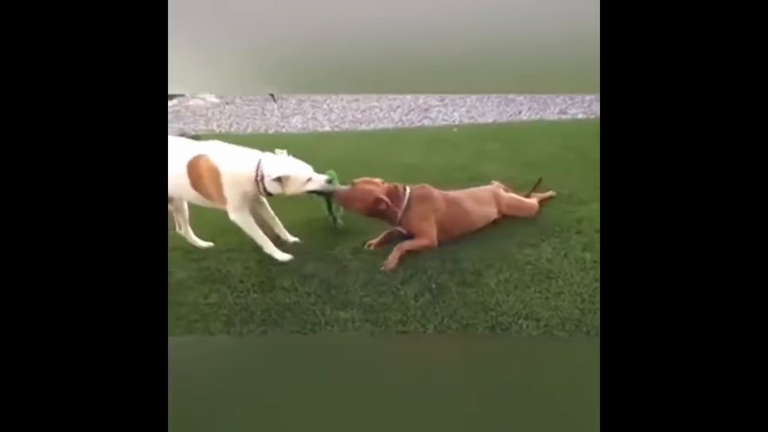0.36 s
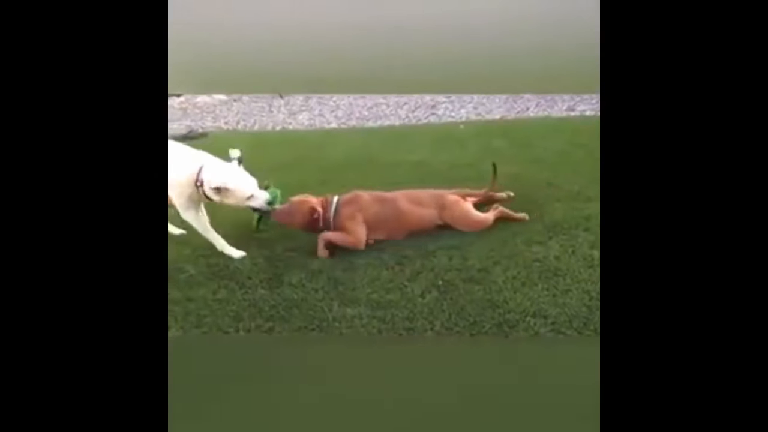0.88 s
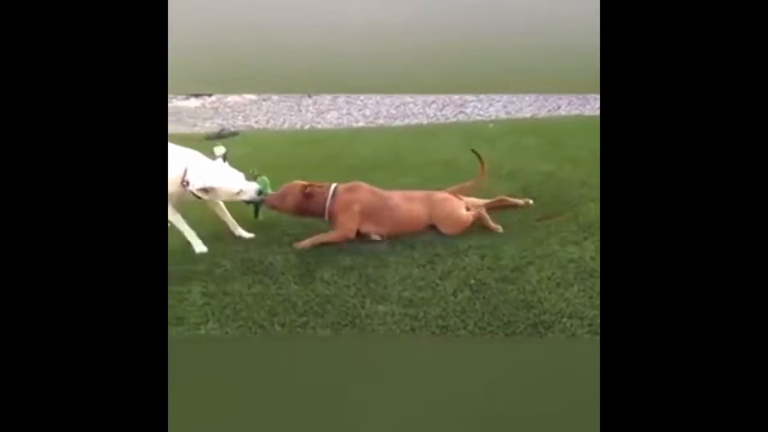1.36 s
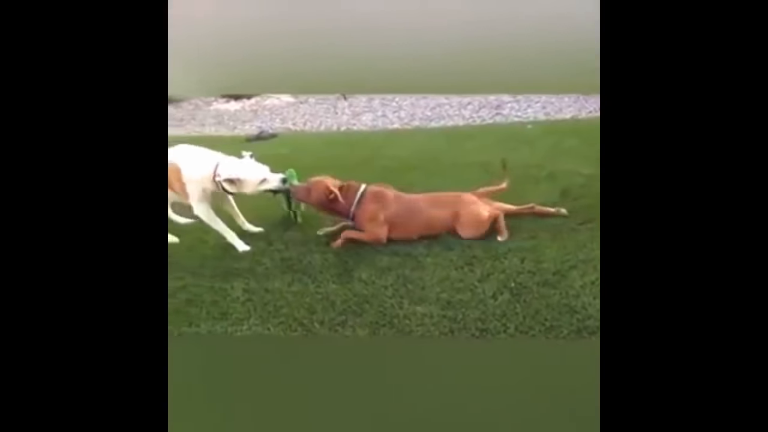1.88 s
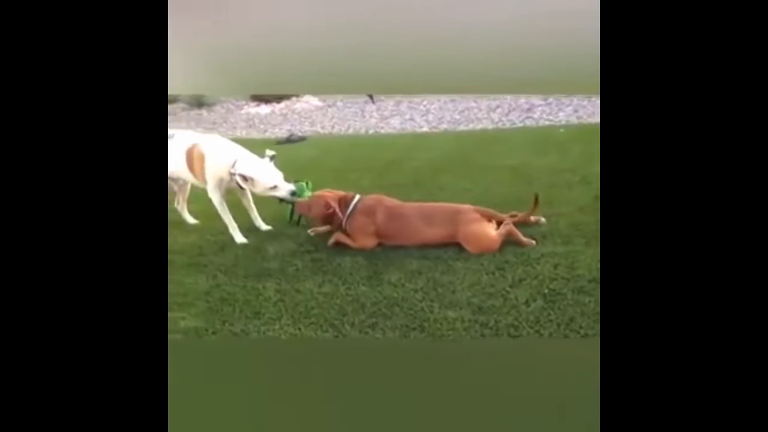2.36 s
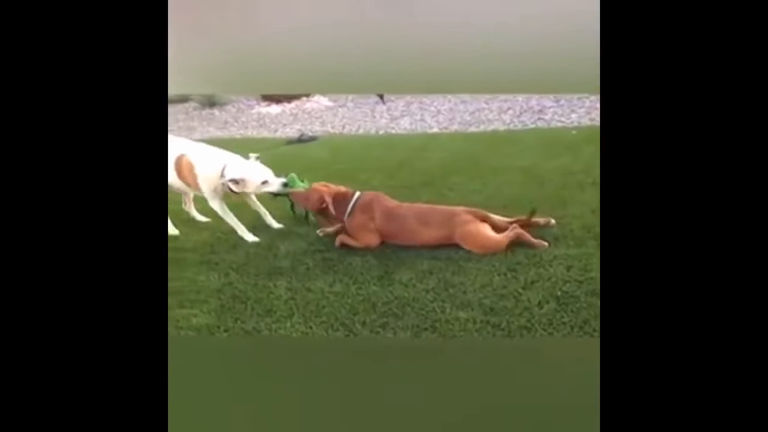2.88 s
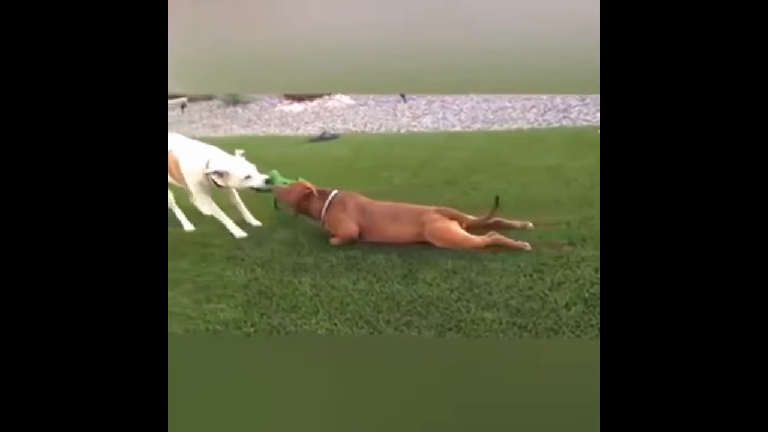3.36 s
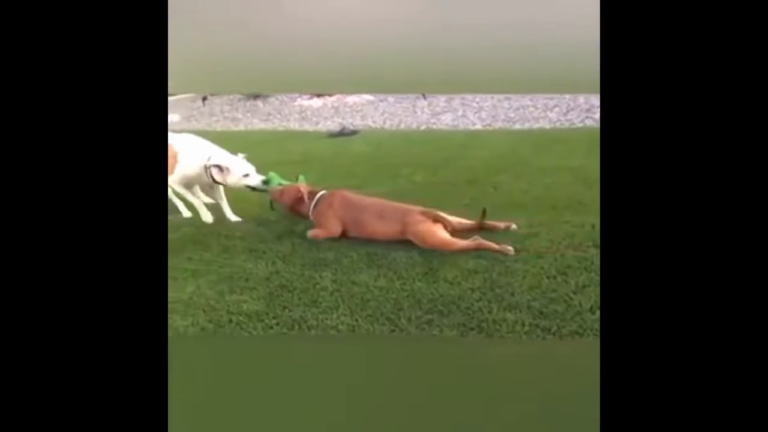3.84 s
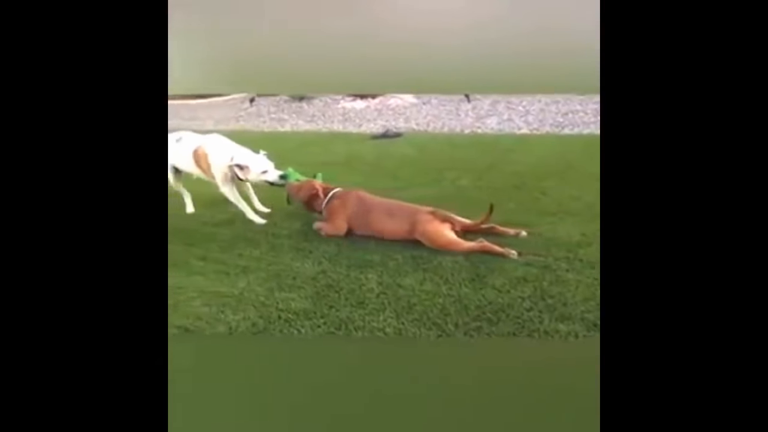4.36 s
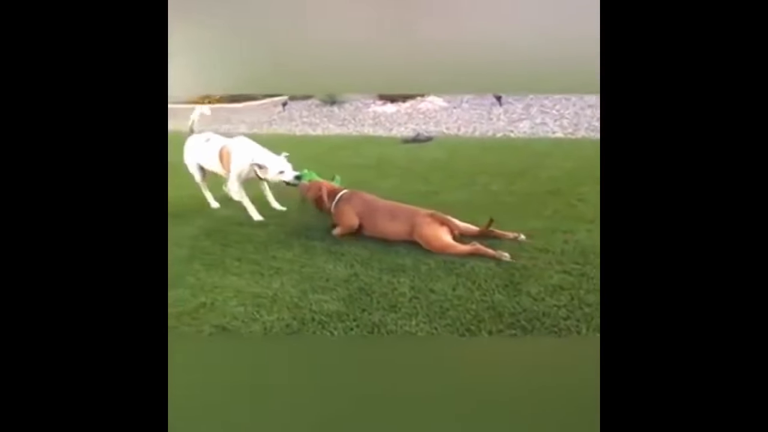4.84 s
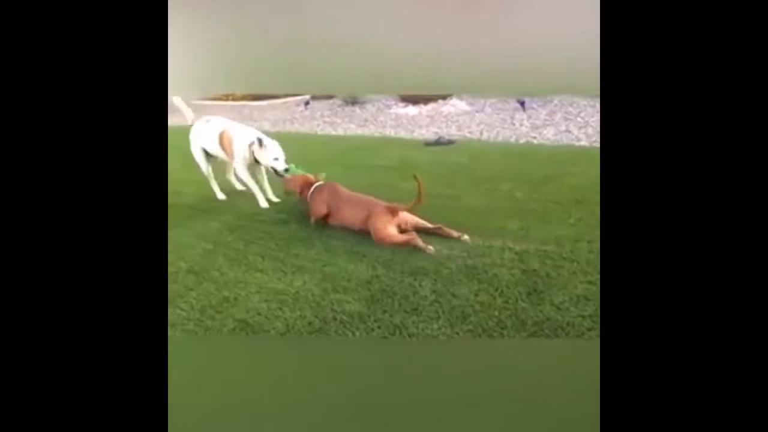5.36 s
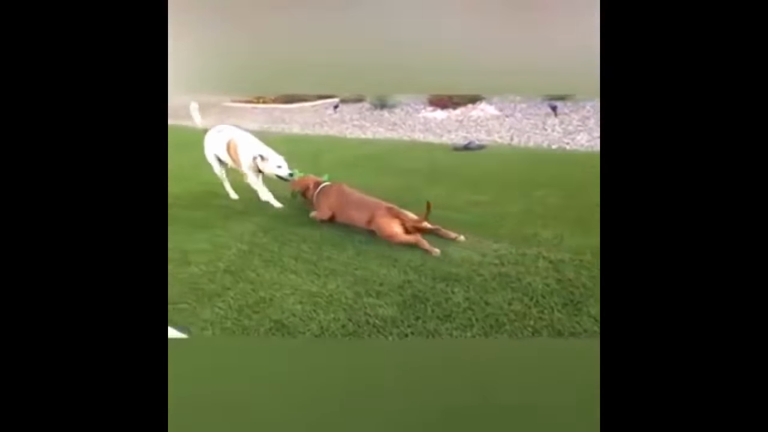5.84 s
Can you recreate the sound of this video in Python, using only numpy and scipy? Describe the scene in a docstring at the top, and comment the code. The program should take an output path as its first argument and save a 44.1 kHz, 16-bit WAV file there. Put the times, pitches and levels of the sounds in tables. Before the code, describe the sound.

For six seconds two dogs growl playfully over a toy gripped in their teeth. The growls start at once, low and throaty, in short uneven bursts of a tenth to nearly half a second, fluttering and gravelly, their pitch sagging and jumping. Strong ones come near 0.9, 1.4 and 2.1 seconds; a longer one runs from about 2.8 to 3.1. Rasping, slightly wet breath rides on them, with hiss between the teeth. Hollow little snaps of jaw and toy scatter throughout, some brighter around 3.1 to 3.5 and clustered from 4.3 to 5. Thin, faint whines slip out around 3.2 to 3.4, 3.7 to 3.9 and 5.05 to 5.3. Light dry grass scuffs are barely noticed. The sound dips for an instant at 1.86. Behind lies a soft outdoor hush, nearly no echo; the small microphone is close, mono, lacking deep bass and the highest treble.

```python
"""Dogs tugging at a toy

Two dogs tug at a toy on a lawn, growling in short throbbing bursts: uneven fold pulses drive resonances.
Noise rasps and hisses through muzzle and teeth; jaws and toy snap as ringing puffs; thin sine whines slip out.
Grass scuffs and a shaped-noise outdoor hush lie around them; the level dips once for an instant."""
import sys
import numpy as np
from scipy import signal
from scipy.io import wavfile
from scipy.ndimage import uniform_filter1d

SR = 44100
rng = np.random.default_rng(int(sys.argv[2]) if len(sys.argv) > 2 else 0)


def generate_wav(sig):
    """Save sig (samples, or channels by samples) to the path in sys.argv[1] as 16-bit PCM at SR."""
    pcm = np.round(np.clip(np.atleast_2d(sig).T, -1, 1) * 32767).astype(np.int16)
    wavfile.write(sys.argv[1], SR, pcm)


def ratio(d):
    """dB to gain"""
    e = np.asarray(d, float) / 20
    return 10 ** e


N = 263277

# growls, one table each: (time [s], effort [dB], fold pitch [Hz])
GROWLS = [
    [(0.002, -27.5, 225), (0.022, -31, 220.8), (0.044, -27, 211.4), (0.058, -38, 211.7), (0.08, -55, 205.9),
     (0.11, -42, 203)],
    [(0.175, -40.5, 148), (0.187, -36.5, 146.5), (0.205, -49, 149.5), (0.215, -42.5, 147.2)],
    [(0.225, -39, 171), (0.257, -27.5, 187.4), (0.279, -28, 188.9), (0.311, -34, 185.2), (0.351, -29, 186),
     (0.375, -42, 204.6), (0.41, -74, 202.3)],
    [(0.507, -38.5, 193.9), (0.521, -32.5, 188.4), (0.547, -36.5, 205.9), (0.615, -36, 212),
     (0.651, -29.5, 190), (0.665, -34.5, 174.7), (0.713, -51.5, 159.5)],
    [(0.72, -47.5, 146.3), (0.756, -30.5, 151.3), (0.812, -46.5, 145.7), (0.834, -37.5, 150.2),
     (0.86, -45.5, 147.7), (0.865, -39.5, 145.2)],
    [(0.872, -35, 242), (0.894, -24.5, 242.2), (0.92, -26.5, 252.8), (0.928, -28.5, 243),
     (0.95, -37, 214.6), (0.976, -51, 192.2), (1.0, -60.5, 193)],
    [(1.072, -37.5, 179.1), (1.098, -32.5, 182.2), (1.132, -39.5, 149.1), (1.162, -36, 148),
     (1.19, -31.5, 159.1), (1.222, -40.5, 153.8), (1.26, -53, 160.5)],
    [(1.338, -37, 202.3), (1.374, -26, 201), (1.398, -29.5, 201.7), (1.426, -26.5, 213.9),
     (1.462, -37.5, 211.2), (1.49, -49, 196.7), (1.51, -58, 196.7)],
    [(1.525, -48, 147.8), (1.597, -39, 150.7), (1.613, -43.5, 149.6), (1.625, -43, 154.1)],
    [(1.632, -35, 197.4), (1.658, -30, 191.9), (1.756, -30, 199.7), (1.786, -33, 180.5),
     (1.886, -40, 182.3), (1.912, -35.5, 160), (1.935, -81, 159.4)],
    [(1.965, -50, 177.3), (1.983, -40.5, 179.8), (1.997, -46, 167.5), (2.015, -47, 161.2),
     (2.033, -42, 160.3), (2.06, -44.5, 155.9)],
    [(2.072, -39, 218.2), (2.098, -21.5, 211.7), (2.13, -29, 181), (2.196, -53, 181.3), (2.22, -43, 177.7),
     (2.242, -49.5, 170.4), (2.27, -57.5, 171.1)],
    [(2.306, -35.5, 197.9), (2.336, -33, 199.2), (2.41, -35.5, 160.4), (2.452, -36, 155.8),
     (2.496, -43, 202.6), (2.576, -40.5, 149.4), (2.62, -59.5, 150)],
    [(2.695, -39.5, 149), (2.709, -52, 148.4), (2.733, -50.5, 147.7), (2.76, -52, 148.2)],
    [(2.775, -46, 167.1), (2.811, -33, 190.6), (2.843, -29, 189.4), (2.889, -31.5, 161.6),
     (2.959, -32, 192.8), (3.063, -37, 151.1), (3.12, -66.5, 148.8)],
    [(3.222, -37, 176.2), (3.236, -31.5, 174.2), (3.25, -34.5, 173.7), (3.272, -49.5, 165.2),
     (3.28, -56, 158.8)],
    [(3.364, -37.5, 163.8), (3.38, -29, 163.4), (3.408, -36.5, 164.1), (3.484, -53, 163.9),
     (3.49, -55.5, 165)],
    [(3.518, -37.5, 191.6), (3.532, -27, 189), (3.568, -35, 192.8), (3.582, -44, 191.9),
     (3.602, -52, 199.3), (3.61, -59.5, 201.7)],
    [(3.71, -33, 180.6), (3.73, -30.5, 178.1), (3.76, -35.5, 196.1), (3.788, -28.5, 171.3),
     (3.818, -33, 168.6), (3.84, -39, 151.1), (3.87, -53, 147.3)],
    [(3.96, -35.5, 202), (3.986, -33, 203.1), (4.016, -31, 184.3), (4.044, -32, 186.7), (4.08, -37.5, 210),
     (4.134, -36, 174.8), (4.19, -53.5, 173.9)],
    [(4.3, -39.5, 172.8), (4.332, -32, 178.5), (4.364, -29.5, 186.3), (4.396, -39.5, 218),
     (4.428, -35, 208.5), (4.458, -38, 169.9), (4.53, -51, 195.8)],
    [(4.56, -36.5, 148.2), (4.576, -45.5, 148.2), (4.602, -37, 149.5), (4.624, -35.5, 149.2),
     (4.65, -43, 163.6), (4.7, -54.5, 163.8), (4.72, -68, 163.8)],
    [(4.81, -49.5, 217.2), (4.846, -32.5, 218.4), (4.894, -35.5, 215.8), (4.93, -41, 275.8),
     (4.962, -33, 269.3), (5.028, -39.5, 164.4), (5.08, -48.5, 154.1)],
    [(5.098, -43.5, 186), (5.12, -28.5, 182.8), (5.15, -52, 201), (5.17, -55, 194.2)],
    [(5.302, -37.5, 201.6), (5.338, -30, 202.7), (5.38, -31.5, 233.4), (5.42, -33, 248.2),
     (5.44, -35.5, 230.3), (5.492, -29, 231.1), (5.544, -42.5, 150), (5.575, -70, 149.7)],
    [(5.732, -32.5, 185.7), (5.758, -40.5, 183.6), (5.78, -30, 174.1), (5.808, -34.5, 196.8),
     (5.882, -41.5, 194.6), (5.934, -29, 205), (5.97, -54, 176)],
]
# moments when the folds lock every second beat: (middle [s], strength [dB], length [s])
FLUTTERS = [(.185, -43, 0.034), (0.257, -32, 0.054), (.55, -31.5, 0.051), (0.647, -44, 0.053),
            (0.754, -30, 0.05), (0.826, -45, 0.042), (.885, -35.5, 0.035), (0.963, -43.5, 0.038),
            (1.121, -29.5, 0.064), (1.194, -41.5, 0.049), (1.347, -40, 0.031), (1.459, -40, 0.038),
            (1.54, -44.5, 0.051), (1.6, -39.5, 0.032), (1.66, -44.5, 0.024), (1.89, -47, 0.028),
            (2.031, -40.5, 0.049), (2.111, -44.5, 0.063), (2.226, -42.5, 0.031), (2.33, -34.5, 0.065),
            (2.406, -36.5, 0.038), (2.53, -34, 0.056), (2.704, -38, 0.035), (2.83, -37, 0.064),
            (2.98, -41, 0.034), (3.07, -45, 0.045), (3.237, -39.5, 0.043), (3.384, -36.5, 0.052),
            (3.482, -46.5, 0.038), (3.62, -41.5, 0.031), (3.751, -33, .06), (3.814, -37.5, 0.038),
            (3.984, -32, 0.043), (4.119, -41.5, 0.069), (4.251, -42, 0.038), (4.331, -34.5, 0.053),
            (4.44, -36.5, 0.043), (4.616, -34.5, 0.045), (4.69, -41, 0.034), (4.83, -31.5, 0.056),
            (4.927, -36, 0.036), (5.0, -35.5, 0.056), (5.322, -30, 0.048), (5.781, -41, 0.06),
            (5.9, -43, 0.046)]
# how the grip on the toy shapes the mouth: (time [s], jaw ring [dB], brightest band between the teeth [Hz])
GRIP = [(0, -2.5, 3720), (.3, -2, 3360), (.39, -5, 3660), (0.599, -1.5, 4170), (.9, 1, 3340),
        (1.15, -8, 3430), (1.42, 0, 3270), (1.75, 0.5, 3960), (1.9, -1, 3230), (2.1, -1, 3410),
        (2.4, -1.5, 3600), (2.9, -3, 3600), (3.4, -2.5, 3530), (3.8, 1, 3800), (4.07, -1, 3670),
        (4.38, -0.5, 3450), (4.51, 3.5, 3900), (4.7, 8, 3470), (4.9, 2, 3700), (5.4, 2.5, 3670),
        (5.85, 3.5, 3640)]
# breaths forced past the toy:
# (start [s], length [s], rasp [dB], mouth resonance [Hz], tooth hiss [dB re rasp])
BREATHS = [(0, 0.092, -40, 1200, -6), (0.113, 0.059, -50.5, 1344, -24), (0.21, 0.21, -43.5, 1480, -9.5),
           (0.376, 0.021, -41.5, 1560, -7.5), (0.455, 0.046, -47.5, 1120, -26),
           (0.517, 0.037, -47.5, 970, -11), (0.524, 0.21, -46.5, 1050, 0), (0.735, 0.086, -48, 1705, -9.5),
           (0.889, 0.042, -36, 1187, -10), (0.939, 0.05, -51.5, 1646, -1.5),
           (1.151, 0.14, -55.5, 1560, -19.5), (1.205, 0.022, -46, 1520, -4),
           (1.376, 0.092, -39.5, 1152, -9.5), (1.461, 0.16, -49.5, 1200, -7.5),
           (1.649, 0.26, -42, 1200, -10.5), (1.866, 0.098, -51.5, 1115, -6), (1.97, 0.18, -52.5, 1133, -12),
           (2.089, 0.087, -44, 1635, -8.5), (2.171, 0.1, -52.5, 1247, -6.5),
           (2.381, 0.35, -51.5, 1685, -13.5), (2.597, 0.0096, -53, 1334, -21),
           (2.712, 0.024, -63, 1134, -14), (2.901, 0.17, -46.5, 1506, -11.5), (3.073, 0.065, -51, 2220, -4),
           (3.25, 0.034, -56.5, 1650, 9.5), (3.376, 0.05, -56, 1470, 1.5), (3.431, 0.038, -45, 1540, -7),
           (3.495, 0.13, -55, 1736, 1.5), (3.758, 0.07, -48, 1400, -2), (3.89, 0.019, -52, 1890, -16),
           (4.014, 0.16, -43.5, 1520, -4.5), (4.145, 0.01, -52.5, 1600, 4), (4.202, 0.019, -44.5, 1453, -5),
           (4.354, 0.18, -45.5, 1870, -5.5), (4.629, 0.11, -56, 1464, 2), (4.844, 0.17, -44.5, 1756, -10.5),
           (5.093, 0.13, -64, 1450, 4), (5.349, 0.21, -42.5, 1680, -4), (5.764, 0.04, -54, 1680, -6),
           (5.818, 0.19, -46, 1710, -4), (5.927, 0.017, -50, 632, -18.5), (5.955, 0.013, -43, 2200, -7)]
# muzzle resonances of the rasp: (centre [Hz], width of one pass [Hz], relative level [dB])
MUZZLE_RESONANCES = [(811, 376, 3), (1200, 105, 7.5), (1920, 247, 4.5)]
# tooth-gap resonances of the hiss: (centre [Hz], width of one pass [Hz], relative level [dB])
TEETH_RESONANCES = [(3280, 1000, 8), (2570, 360, -3.5), (3850, 1600, 2), (4550, 1100, 10),
                    (6000, 3300, -0.5)]
# single hard beats of the throat: (time [s], level before BEAT_TRIM_DB [dB], chest ring [Hz])
BEATS = [(0.515, -25.5, 170), (0.747, -19, 170), (1.079, -23.5, 174), (1.103, -20.5, 168.7),
         (1.347, -25.5, 170), (1.629, -26, 169), (2.307, -24.5, 172), (2.399, -24.5, 168),
         (2.828, -21.5, 170.5), (3.231, -24, 171), (3.364, -26, 170), (3.71, -23, 169), (3.984, -21, 169),
         (4.327, -19.5, 170.5), (4.605, -22.5, 172), (5.318, -34, 170), (5.317, -20, 172),
         (5.739, -27.5, 171), (5.76, -22, 168)]
# snaps of jaw, lips and toy:
# (time [s], puff peak [dB], ring [Hz], length scale [s], thump before its decay [dB])
SNAPS = [(0.179, -29.5, 960, 0.0079, -27), (0.235, -33.5, 843, 0.013, -23),
         (0.253, -28.5, 1184, 0.014, -22), (0.357, -34, 1210, 0.0098, -33), (0.835, -30, 1071, 0.0041, -19),
         (0.901, -28, 1162, 0.011, -35), (1.14, -35.5, 995, 0.0052, -21.5),
         (1.17, -33.5, 1630, 0.0065, -22), (1.236, -31, 1463, 0.015, -55.5),
         (1.377, -24.5, 1030, 0.0069, -17), (1.416, -29, 1230, 0.008, -45), (1.49, -26, 2700, 0.0022, -43),
         (1.537, -33.5, 1255, 0.006, -33), (1.574, -28.5, 1180, 0.0016, -19.5),
         (1.594, -34.5, 1200, 0.0042, -25.5), (1.728, -34.5, 925, 0.006, -38),
         (1.983, -40, 1096, 0.0087, -27.5), (2.014, -30, 902, 0.0091, -24.5),
         (2.081, -35, 899.5, 0.0056, -24), (2.103, -28.5, 1752, 0.0089, -47), (2.36, -38, 1810, 0.014, -22),
         (2.417, -34.5, 1990, 0.014, -33), (2.559, -39, 1200, 0.012, -53),
         (2.587, -23.5, 1263, 0.0075, -57), (2.645, -47, 1153, 0.0043, -33.5),
         (2.702, -38, 1130, 0.0065, -21.5), (2.718, -37.5, 1090, 0.0052, -41),
         (2.779, -34, 895, 0.0029, -19.5), (2.886, -32, 1047, 0.0073, -22), (2.912, -30, 1036, 0.011, -52),
         (2.971, -37, 1080, 0.006, -31), (3.002, -35, 1933, 0.017, -51), (3.116, -38, 3910, 0.0062, -52),
         (3.174, -26.5, 3330, 0.006, -54), (3.261, -37.5, 1639, 0.0082, -47),
         (3.436, -29.5, 1730, 0.0061, -46), (3.44, -32.5, 1230, 0.016, -26),
         (3.503, -39.5, 2860, 0.0061, -55), (3.515, -28.5, 3240, 0.0054, -45),
         (3.582, -39.5, 1989, 0.0085, -61), (3.833, -31.5, 1605, 0.012, -57),
         (3.894, -30.5, 2170, 0.004, -34), (4.142, -29.5, 1640, 0.016, -35),
         (4.326, -32, 1020, 0.0025, -34), (4.387, -42, 2060, 0.0065, -40),
         (4.428, -35.5, 1920, 0.0087, -28), (4.431, -29, 1120, 0.0046, -16.5),
         (4.464, -32.5, 1810, 0.013, -46), (4.653, -34.5, 3868, 0.0034, -55),
         (4.671, -23, 1200, 0.0016, -55), (4.693, -42, 1760, 0.0073, -40),
         (4.775, -34.5, 863.3, 0.0041, -23.5), (4.84, -34, 1781, 0.003, -18),
         (4.876, -35, 1500, 0.0025, -20), (4.897, -27, 1900, 0.0053, -44), (4.924, -29, 1092, 0.005, -50),
         (4.934, -31, 1870, 0.0067, -17.5), (4.992, -32.5, 1820, 0.0034, -21),
         (5.031, -38, 1536, 0.014, -45), (5.252, -35.5, 1529, 0.0031, -37), (5.563, -43, 1919, 0.0056, -52),
         (5.692, -29, 960, 0.0034, -48)]
# whines, one table each: (time [s], pitch [Hz], level [dB])
WHINES = [
    [(3.12, 475, -71), (3.165, 508, -63), (3.19, 534.5, -44)],
    [(3.195, 635, -59), (3.245, 662.4, -54.5), (3.29, 639.7, -62.5), (3.33, 615, -60), (3.37, 619, -53),
     (3.41, 605, -55), (3.45, 588.7, -72)],
    [(3.67, 500.7, -59), (3.72, 505.5, -52)],
    [(3.85, 503.3, -53), (3.89, 498.4, -69)],
    [(5.05, 501.7, -50), (5.095, 504, -49)],
    [(5.125, 504, -47.5), (5.27, 512.6, -57.5)],
]
# paws and bodies scuffing the grass: (middle [s], level [dB], length [s])
SCUFFS = [(.62, -48.5, 0.035), (1.05, -57, .12), (1.3, -59.5, 0.038), (1.22, -61.5, 0.039),
          (1.49, -40, 0.011), (1.75, -45.5, 0.017), (2.16, -54.5, 0.13), (3.12, -58.5, 0.04),
          (3.65, -56, 0.097), (4.1, -73, 0.089), (5.2, -50.5, 0.038), (5.5, -62.5, 0.34)]
# spectrum of the hush: (frequency [Hz], relative density [dB per Hz])
HUSH_SPECTRUM = [(15, -42.5), (25, 8.5), (87, 7), (383, -10), (501, -5.5), (566, -10.5), (921, -12.5),
                 (1040, -13.5), (1260, -13.5), (1910, -14.5), (2160, -17.5), (2690, -16), (8460, -24),
                 (11000, -15.5), (18600, -120)]

FLUTTER_REST_DB = -16  # flutter between the locked moments, re effort
CHEST_TOP_HZ = 303  # with the mouth full, chest tone and flutter fall off above this
OVERTONE_DB, JAW_DB = -14.5, -5.5  # re the mean of effort and rasp, before the grip's ring
JAW_SHUT_DB = -60.5  # jaw overtones re effort with the jaw shut
SWELL_S, EASE_S = 0.0094, 0.018  # a breath gains and loses 20 dB over these times
ARCH_DB, SLANT_DB = 7.5, -4.5  # breath: ends below middle; change from start to end
BEAT_TRIM_DB, BEAT_DECAY_S = -4, 0.0057
RING_WIDTH_RATIO = 0.2  # one-pass width of a snap's ring, re its pitch
UPPER_RING_GAIN = 0.21  # the cavity's second ring
CRACKLE_S = 0.0026  # snaps shorter than this are more crackle than ring
HUSH_DB = -46


def evened(x):
    """Scales to rms 1."""
    return x / np.sqrt(np.mean(x ** 2) + 1e-20)


def wander(rate_hz):
    """Low-passed noise of rms 1, changing up to about rate_hz times a second."""
    lowpass = signal.butter(2, rate_hz, fs=SR, output="sos")
    return evened(signal.sosfilt(lowpass, rng.standard_normal(N)))


def resonate(x, hz, width_hz):
    """Shifts hz (may glide) down to zero, smooths, shifts back: a resonance of gain 1."""
    turn = np.exp(2j * np.pi * np.cumsum(hz * np.ones(len(x))) / SR)
    r = np.exp(-np.pi * width_hz / SR)
    return 2 * (turn * signal.lfilter([1 - r], [1, -r], x / turn + 1e-18)).real


def steep(x, hz, width_hz):
    """A resonance applied twice, for dark skirts."""
    return resonate(resonate(x, hz, width_hz), hz, width_hz)


def play(tables, fade_s):
    """Joins tables into full-length columns, after a mask that is 1 while one sounds."""
    t, on = np.arange(N) / SR, np.zeros(N)
    s, *columns = np.transpose(np.concatenate(tables))
    for rows in tables:
        on[round(rows[0][0] * SR):round(rows[-1][0] * SR)] = 1
    on = uniform_filter1d(on, max(round(fade_s * SR), 1))
    return on, *(np.interp(t, s, c) for c in columns)


def bells(rows):
    """Sums events that swell and die as a bell shape."""
    t = np.arange(0, N + 64, 64) / SR
    s, strength_db, length_s = np.transpose(rows)[..., None]
    total = (ratio(strength_db) * np.exp(-(2 * (t - s) / length_s) ** 2)).sum(0)
    return np.interp(np.arange(N) / SR, t, total)


def dogs():
    """Unsteady vocal folds drive chest tone, flutter and jaw overtones, and pulse the breath."""
    on, effort_db, pitch_hz = play(GROWLS, fade_s=.008)
    effort = on * ratio(effort_db)
    locked = bells(FLUTTERS) + effort * ratio(FLUTTER_REST_DB)
    flutter_db = 20 * np.log10(locked + 1e-9) - effort_db
    chaos = np.clip(1 + flutter_db / 25, .55, .85)  # the more flutter, the less steady the folds
    rasp_gain, hiss_gain, mouth_hz = breaths()
    s, *grip = np.transpose(GRIP)
    ring_db, gap_hz = (np.interp(np.arange(N) / SR, s, c) for c in grip)

    throb = throat_throb(on)
    turns, pulses, last_slap = folds(pitch_hz, chaos, throb)
    air = turbulence(turns, pulses, last_slap)

    chest = evened(steep(pulses, np.minimum(pitch_hz, 240), 175))  # the chest passes little above this
    low = effort * chest + locked * flutter_tone(turns, pulses, pitch_hz)
    low = signal.sosfilt(signal.butter(4, CHEST_TOP_HZ, fs=SR, output="sos"), low)

    # second and third partial, from the sharp closing of the folds
    overtones = evened(steep(pulses, 2 * pitch_hz, 130) + 1.1 * steep(pulses, 3 * pitch_hz, 170))
    mouth = np.sqrt(effort * rasp_gain) * ratio(ring_db)
    jaw_gain = effort * ratio(JAW_SHUT_DB) + mouth * ratio(JAW_DB)
    voice = low + mouth * ratio(OVERTONE_DB) * overtones + jaw_gain * jaw_ring(pulses, air)

    rasp, hiss = breath_noise(air, throb, mouth_hz, gap_hz)
    return voice + rasp_gain * rasp + hiss_gain * hiss


def throat_throb(on):
    """Loose throat tissue flaps some 30 times a second."""
    throb = np.sin(2 * np.pi * np.cumsum(31 * (1 + .35 * wander(12))) / SR)
    return throb * uniform_filter1d(on, 1800, origin=899) ** 2  # takes 40 ms of growling to get going


def folds(pitch_hz, chaos, throb):
    """The folds close once a turn, at jittered pitch, slapping with uneven strength."""
    turns = np.cumsum(pitch_hz * (1 + .24 * chaos * wander(60))) / SR
    closing = np.diff(np.floor(turns), prepend=0) > 0
    slap_db = 2.5 * np.tanh(wander(70)) + 6 * throb + 5 * rng.uniform(-1, 1, N)
    slap = ratio(chaos * slap_db)
    last_slap = slap[np.maximum.accumulate(closing * np.arange(N))]
    return turns, closing * slap, last_slap


def turbulence(turns, pulses, last_slap):
    """Each fold turn lets out a decaying puff of noise, with the slaps riding on it."""
    decay = np.exp(-(turns % 1) / .3)
    puff = .3 + decay * np.minimum(last_slap, 1.6) * ratio(3 * np.tanh(wander(60)))
    return evened(evened(puff * rng.standard_normal(N)) + 0.36 * evened(pulses))


def flutter_tone(turns, pulses, pitch_hz):
    """The folds often lock every second beat, then slip: tones near odd multiples of half pitch."""
    every_other = (-1) ** np.floor(turns) * np.tanh(3 * wander(19))
    uneven = pulses * (every_other + np.tanh(2.2 * wander(90)))
    lower = steep(uneven, .57 * pitch_hz, 95)
    upper = steep(uneven, np.minimum(1.45 * pitch_hz, 285), 69)
    return evened(lower + 0.82 * upper)


def jaw_ring(pulses, air):
    """Slaps and air ring the jaw; one resonance wanders as the jaw shifts its grip."""
    rough = 0.11 * evened(pulses) + air
    shifting = steep(rough, 520 * (1 + 0.12 * wander(7.56)), 73)
    return evened(shifting + 0.48 * steep(rough, 460, 330))


def breaths():
    """Sums the breaths into rasp and hiss gains; the mouth glides from one shape to the next."""
    t, now = np.arange(0, N + 64, 64) / SR, np.arange(N) / SR
    s, length_s, rasp_db, mouth_hz, hiss_db = np.transpose(BREATHS)[..., None]
    along = np.clip((t - s) / length_s, 0, 1)
    early_s, late_s = np.maximum(s - t, 0), np.maximum(t - s - length_s, 0)
    shape_db = -20 * (early_s / SWELL_S + late_s / EASE_S)
    shape_db = shape_db - ARCH_DB * (2 * along - 1) ** 2 + SLANT_DB * (along - .5)
    rasp = ratio(rasp_db + shape_db).sum(0)
    hiss = ratio(rasp_db + hiss_db + shape_db).sum(0)
    glide_hz = np.interp(now, (s + length_s / 2)[:, 0], mouth_hz[:, 0])
    return np.interp(now, t, rasp), np.interp(now, t, hiss), glide_hz


def formants(x, table, shift=1):
    """Parallel resonances of alternating sign."""
    return sum((-1) ** k * ratio(db) * steep(x, hz * shift, width_hz)
               for k, (hz, width_hz, db) in enumerate(table))


def breath_noise(air, throb, mouth_hz, gap_hz):
    """Lumpy air rings mouth and muzzle as rasp; a steadier stream rings the tooth gaps as hiss."""
    smooth = air * ratio(3.6 * np.tanh(wander(33)))
    air = air * ratio(2.5 * np.tanh(wander(45)) + 1.5 * throb)  # spit and cloth break the stream into lumps
    pops = (rng.random(N) < 45 / SR) * rng.uniform(-1, 1, N)  # wet pops, some 45 a second
    pop = np.exp(-np.arange(60) / 12) * rng.standard_normal(60)
    air = air + 4 * signal.oaconvolve(pops * abs(wander(20)), pop)[:N]

    lips = 1 + .05 * np.tanh(wander(7))  # sliding lips shift the muzzle's resonances
    rasp = steep(air, mouth_hz, 530) + 0.5 * formants(air, MUZZLE_RESONANCES, lips)
    rasp = signal.sosfilt(signal.butter(3, 2500, fs=SR, output="sos"), rasp)  # the muzzle dulls the top
    smooth = smooth + 0.59 * air
    hiss = steep(smooth, gap_hz, 900) + 0.17 * formants(smooth, TEETH_RESONANCES)
    return evened(rasp), evened(hiss)


def beats():
    """A hard closing of the folds kicks the chest into a brief decaying ring."""
    out, t = np.zeros(N + 2000), np.arange(2000) / SR
    for s, level_db, ring_hz in BEATS:
        kick = t * np.exp(-t / BEAT_DECAY_S) * np.sin(2 * np.pi * ring_hz * t - 1.0)
        out[round(s * SR):][:2000] += ratio(level_db + BEAT_TRIM_DB) * kick / abs(kick).max()
    return out[:N]


def snaps():
    """Each snap is a short puff ringing a small cavity, over a dull low push."""
    out, t = np.zeros(N + 3000), np.arange(3000) / SR
    noise = rng.standard_normal((len(SNAPS), 3000))
    noise[:, 30] += 12  # one strong early grain sets each snap's ring going evenly
    for (s, peak_db, ring_hz, length_s, thump_db), n in zip(SNAPS, noise):
        scale_s = max(length_s, .002)
        u = t / scale_s
        shape = u ** 2.2 * np.exp(-4.2 * u)
        width_hz = RING_WIDTH_RATIO * ring_hz
        upper_hz = min(1.66 * ring_hz, ring_hz + 800)
        ring = evened(steep(n, ring_hz, width_hz) + UPPER_RING_GAIN * steep(n, upper_hz, width_hz))
        crackle = evened(resonate(n, 1.15 * ring_hz, 0.99 * ring_hz))
        puff = shape * (ring + CRACKLE_S / scale_s * crackle)
        thump = -np.sin(2 * np.pi * 220 * t) * np.exp(-t / 0.0024)
        out[round(s * SR):][:3000] += ratio(peak_db) * puff / abs(puff).max() + ratio(thump_db) * thump
    return out[:N]


def whines():
    """Thin, nearly pure tones through the nose."""
    on, pitch_hz, level_db = play(WHINES, fade_s=0.016)
    turns = np.cumsum(pitch_hz * (1 + .002 * wander(25))) / SR
    level = np.sqrt(2) * ratio(level_db + 0.6 * wander(20))  # table level is rms
    return on * level * np.sin(2 * np.pi * turns)


def scuffs():
    """Dry blades of grass crackle high and thin: gritty noise through a broad resonance."""
    grit = rng.standard_normal(N) * ratio(4.0 * wander(300))
    return bells(SCUFFS) * evened(steep(grit, 5900, 6000))


def hush():
    """Distant outdoor noise and grass rustle: spectrally shaped noise in drifting patches."""
    frames, bins_hz = N // 256 + 5, np.fft.rfftfreq(1024, 1 / SR)
    a, b, patches = rng.standard_normal((frames, 513, 3)).T
    patches = evened(uniform_filter1d(uniform_filter1d(patches, 12, 0), 12, 1))
    hz, db = np.transpose(HUSH_SPECTRUM)
    spectrum_db = np.interp(np.log(bins_hz + 1), np.log(hz + 1), db)[:, None]
    z = (a + 1j * b) * ratio(spectrum_db + 1.5 * patches)
    noise = signal.istft(z, nperseg=1024, noverlap=768)[1][:N]
    return ratio(HUSH_DB + wander(9.0)) * evened(noise)


def scene():
    """The dogs, with one soft bounce off the ground, over the hush."""
    near = dogs() + beats() + snaps() + whines() + scuffs()
    near[70:] += 0.017 * near[:-70]  # 1.6 ms later
    return (near + hush())[None]


def low_pass(x):
    """Removes everything above the highest recorded frequency."""
    return signal.sosfilt(signal.butter(12, 8610, fs=SR, output="sos"), x)


def record(dry):
    """Band limits, soft rounding of peaks and one brief level dip."""
    edge_hz, dip_start_s, dip_end_s, dip_db = 8700, 1.8525, 1.8745, -26
    lowpass = signal.firwin(511, edge_hz, window=("kaiser", 9), fs=SR)
    x = signal.oaconvolve(dry, lowpass[None], "same")
    x = signal.sosfilt(signal.butter(2, 55, "high", fs=SR, output="sos"), x)  # small microphone, no deep bass
    x = .2 * np.tanh(x / .2)  # the input stage rounds off the loudest peaks
    x[:, round(dip_start_s * SR):round(dip_end_s * SR)] *= ratio(dip_db)
    return low_pass(x)


dry = scene()
out = record(dry)
generate_wav(out)
```